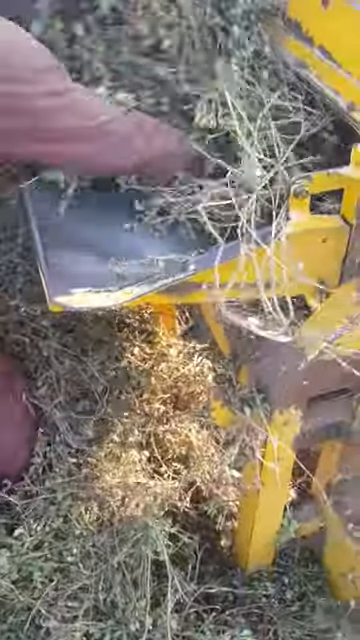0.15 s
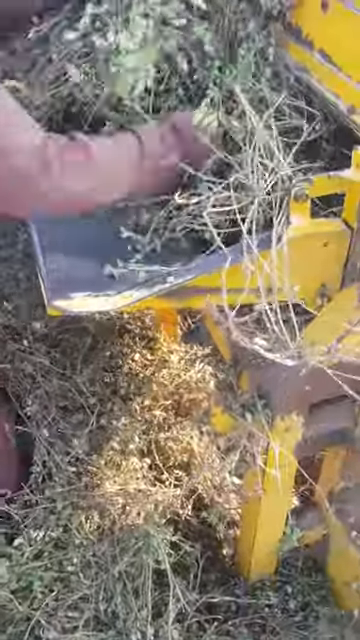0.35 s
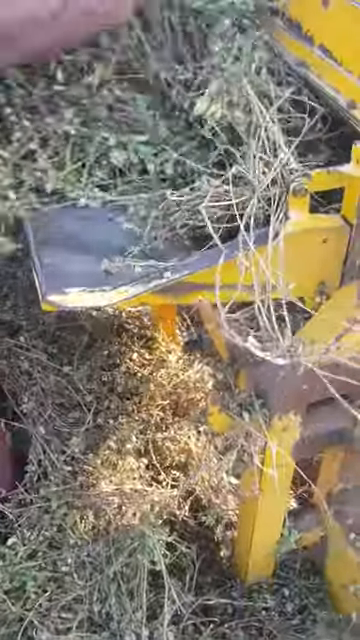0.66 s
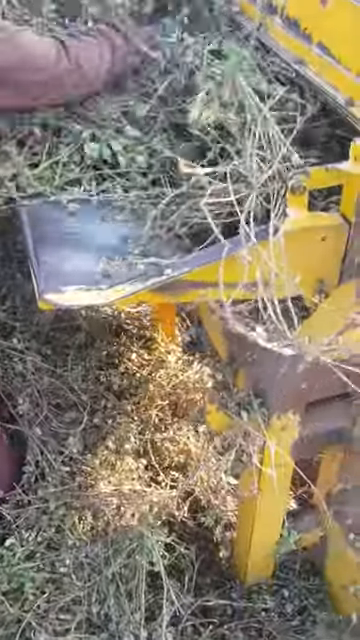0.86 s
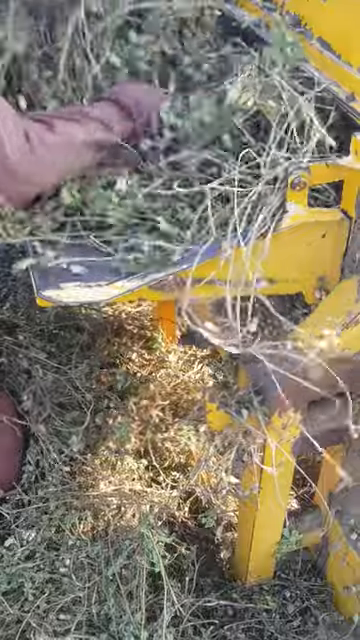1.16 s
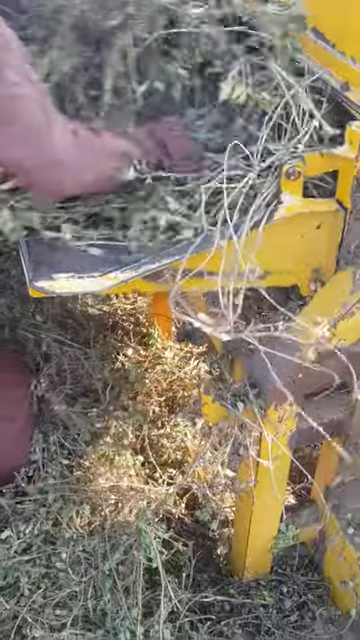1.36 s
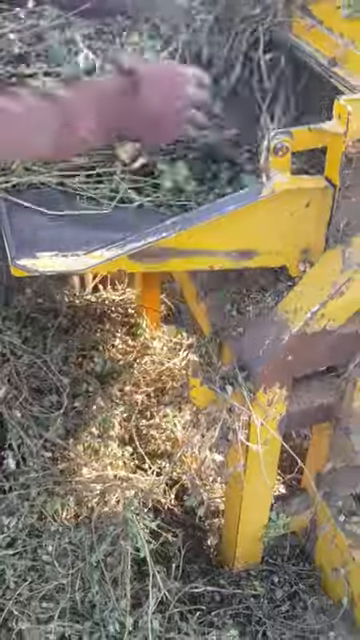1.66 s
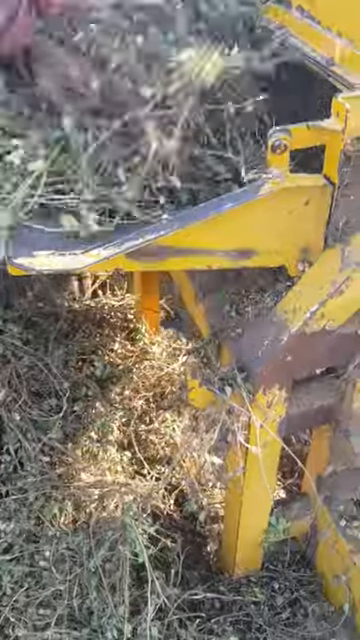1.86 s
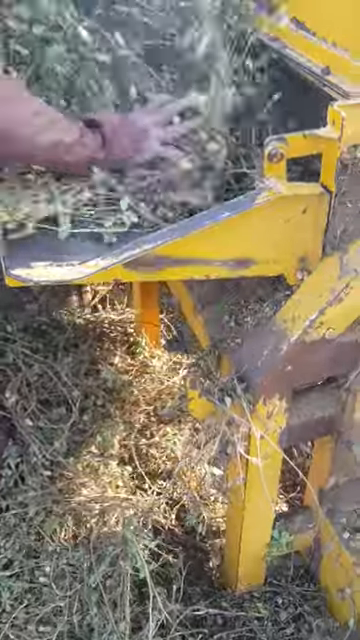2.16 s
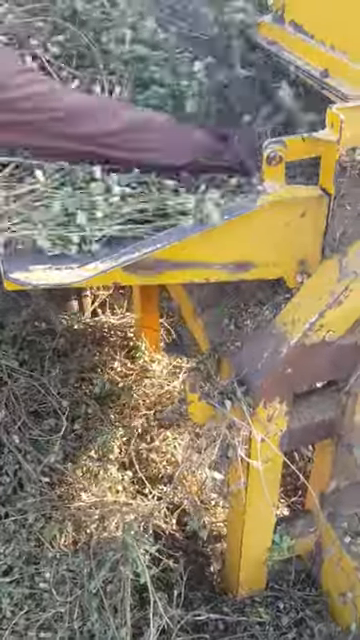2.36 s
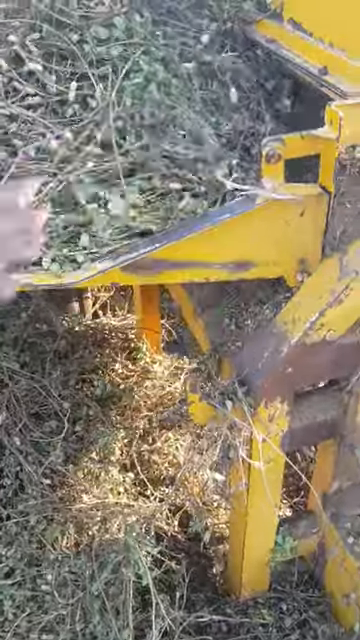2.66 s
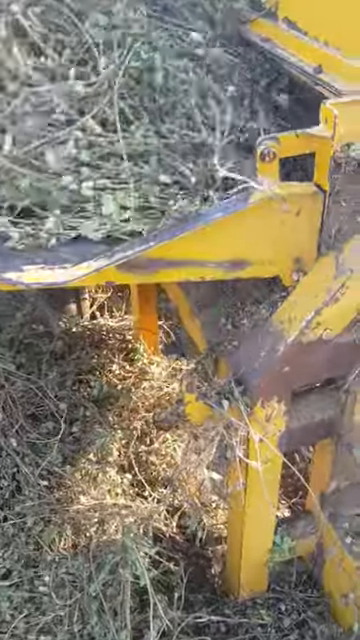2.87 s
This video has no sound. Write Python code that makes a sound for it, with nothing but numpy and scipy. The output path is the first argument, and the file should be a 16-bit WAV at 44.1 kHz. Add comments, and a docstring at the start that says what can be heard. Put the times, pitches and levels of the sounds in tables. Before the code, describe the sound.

A tractor-driven threshing machine drones loudly for all three seconds, close by in the open, over a throbbing engine roar. Dry vines crackle inside, and the sieve knocks lightly four or five times a second. At about 1.5 seconds the crackling swells as more crop goes in, with a sharp crack against metal on the right at 1.6. Smaller cracks and stem snaps follow until the end.

```python
"""A loud drone over a throbbing roar: a tractor-driven peanut thresher in an open field, heard in
stereo from beside its feed tray. The spinning drum drones, the engine fires low beneath it, and air
and crop roar in the steel housing. The shaking sieve knocks as it turns. Dry vines crackle in the
drum, more loudly once a fresh bundle goes in, and hard bits crack against the metal."""
import sys
import numpy as np
from scipy import signal
from scipy.fft import rfft, irfft
from scipy.io import wavfile

SR = 44100
rng = np.random.default_rng(int(sys.argv[2]) if len(sys.argv) > 2 else 0)


def int16_out(signal):
    """Quantize to a 16-bit WAV file."""
    q = np.round(np.clip(np.atleast_2d(signal).T, -1, 1) * 32767)
    wavfile.write(sys.argv[1], SR, q.astype(np.int16))


N = 133182
T = np.arange(N) / SR
BIN_HZ = np.arange(N // 2 + 1) * SR / N
CRANK_HZ = 29.8
FEED_LAG_S = 0.00026   # the feed opening lies to the right, so the left microphone hears it later

# spectrum of dry crop crackling: f/Hz, left level/dB, right level/dB
CRACKLE_SPECTRUM = [(800, -85, -96), (1980, -72.5, -70.5), (3680, -83, -74.5), (5300, -86, -68.5),
                    (6650, -92, -74.5), (8060, -95, -84), (9070, -83, -80.5), (11020, -84, -79.5),
                    (12370, -85.5, -72), (15500, -94, -76.5)]


def from_db(db):
    """Decibels to gain."""
    return 10 ** (np.asarray(db) / 20)


def in_time(rows):
    """A curve of (time, value) points at every sample."""
    return np.interp(T, *np.transpose(rows))


def over_hz(rows):
    """Each column of a spectrum at every frequency bin."""
    hz, *columns = np.transpose(rows)
    log_bins = np.log(np.maximum(BIN_HZ, 1))
    return np.array([np.interp(log_bins, np.log(hz), column) for column in columns])


def drift(rate_hz):
    """Slow random wander with a spread of 1."""
    step, settle = 40, 2000
    pole = np.exp(-2 * np.pi * rate_hz * step / SR)
    noise = rng.standard_normal(N // step + settle + 2)
    slow = signal.lfilter([1], [1, -2 * pole, pole * pole], noise)[settle:]
    return np.interp(np.arange(N) / step, np.arange(len(slow)), slow / slow.std())


def colour(white, spectrum):
    """Give white stereo noise a spectrum in dB per Hz."""
    return irfft(rfft(white) * from_db(over_hz(spectrum)), N) * np.sqrt(SR / 2)


def split(x, hz):
    """The parts below and above a frequency; they sum to the whole."""
    low = irfft(rfft(x) / (1 + (BIN_HZ / hz) ** 10), N)
    return low, x - low


def burst(start, attack_s, hold_s, decay_s):
    """Envelope with a linear attack, a hold and an exponential release."""
    age = T - start
    return np.clip(age / attack_s, 0, 1) * np.exp(-np.clip((age - attack_s - hold_s) / decay_s, 0, 20))


def grains(per_s=4000, spread_db=3.5, click_share=0.38, likeness=0.27):
    """Countless tiny contacts over a smooth hiss, partly shared by both microphones; white, rms 1."""
    sizes = from_db(spread_db * np.minimum(rng.exponential(1, (3, N)), 5))
    clicks = sizes * rng.choice([-1, 1], (3, N)) * (rng.random((3, N)) < per_s / SR)
    hiss = np.sqrt(1 - click_share) * rng.standard_normal((3, N))
    left, right, both = np.sqrt(click_share) * clicks / clicks.std() + hiss
    shared = np.array([np.interp(T - FEED_LAG_S, T, both), both])
    return np.sqrt(1 - likeness) * np.array([left, right]) + np.sqrt(likeness) * shared


def bright_crackle(above_hz):
    """The treble alone of dry crop crackling."""
    highpass = signal.butter(4, above_hz, "high", fs=SR, output="sos")
    return signal.sosfilt(highpass, colour(grains(), CRACKLE_SPECTRUM))


def steel(force, modes):
    """Parallel resonances of a steel part; a white force of rms 1 drives each to its level."""
    ringing = 0
    for k, (hz, width, db) in enumerate(modes):
        radius = np.exp(-np.pi * width / SR)
        forward = np.sqrt((1 - radius ** 2) / 2) * np.array([1, 0, -1])
        feedback = [1, -2 * radius * np.cos(2 * np.pi * hz / SR), radius ** 2]
        ringing += (-1) ** k * from_db(db) * signal.lfilter(forward, feedback, force)
    return ringing


def tone(turns, db):
    """One tone of a turning part, wavering in pitch and level."""
    wobble_turns = 0.035 * drift(rate_hz=9)
    amplitude = np.sqrt(2) * from_db(db + 0.73 * drift(rate_hz=11))
    return amplitude * np.sin(2 * np.pi * (turns + wobble_turns + rng.random()))


def engine():
    """Low firing tones of the tractor."""
    # engine tones: multiple of the crank rate, level/dB
    orders = [(2, -30.5), (4, -36), (5, -60), (7, -35.5)]
    return sum(tone(k * CRANK_HZ * T, db) for k, db in orders)


def housing(feed_above_hz=1100):
    """Air and tumbling crop roar in the sheet-steel body, pulsing with the crank, churning with load."""
    # spectrum of the roar: f/Hz, left level/dB, right level/dB
    roar_spectrum = [(22, -77, -77), (32, -66, -66), (49.3, -45.5, -56.5), (71, -41, -38.5),
                     (97, -46, -47.5), (127, -50, -49), (159.5, -47.5, -40), (234, -45, -41.5),
                     (299, -49.5, -47.5), (318.6, -43.5, -44.5), (416, -50, -52.5), (472, -49, -49),
                     (530, -56.5, -49.5), (646, -57, -48), (652, -59.5, -53), (800, -58.5, -60.5),
                     (897, -62.5, -54.5), (1280, -67.5, -62), (1800, -72.5, -65.5), (2110, -75, -70),
                     (2700, -95.5, -75), (5000, -84, -90), (9000, -105, -100)]
    # likeness of the roar at the two microphones: f/Hz, correlation
    likeness = [(100, 1), (210, 0.94), (300, 0.75), (450, 0.99), (690, 0.35), (850, 0.71), (1100, 0.27),
                (1400, 0.26), (3000, 0.21)]
    alike = over_hz(likeness)
    mid, side = rfft(rng.standard_normal((2, N)))
    pair = np.sqrt((1 + alike) / 2) * mid + np.sqrt((1 - alike) / 2) * side * [[1], [-1]]
    lag_s = FEED_LAG_S * (BIN_HZ > feed_above_hz) * [[1], [0]]   # the treble leaves by the feed opening
    white = irfft(pair * np.exp(-2j * np.pi * BIN_HZ * lag_s), N)
    throb = 1 + 0.077 * np.sin(2 * np.pi * CRANK_HZ * T)
    churn = from_db(0.59 * drift(rate_hz=25.2))
    return colour(white * throb * churn, roar_spectrum)


def sieve():
    """As the sieve turns, the loose frame chatters and pods land on the mesh, right of centre."""
    # sieve strokes: t/s, knock level/dB, pod level/dB (both relative)
    strokes = [(.021, -1.5, 0.5), (.235, -10, -8), (0.461, -5, -3), (.672, -17, -1), (0.891, -4.5, 1),
               (1.107, -7, -4), (1.322, -1.5, -1.5), (1.539, -3.5, -4), (1.760, -8, -12), (1.97, -7, -7),
               (2.414, -8, -5), (2.634, -12, -2), (2.856, -1, -13)]
    # resonances of the frame: f/Hz, width/Hz, level/dB
    frame_modes = [(1140, 71, -31), (1480, 180, -36.5), (1734, 40, -30), (2003, 270, -31.5),
                   (2870, 620, -38)]
    knocks = pods = 0
    for t, knock_db, pod_db in strokes:
        knocks += from_db(knock_db) * burst(t, attack_s=0.0012, hold_s=0.018, decay_s=0.017)
        pods += from_db(pod_db + 3.5) * burst(t + 0.0041, attack_s=0.0012, hold_s=0.0069, decay_s=0.013)
    chatter = steel(knocks * grains(), frame_modes) * from_db([[-4], [0]])
    return chatter + pods * bright_crackle(above_hz=5900)


def cracks():
    """Clods and thick roots are flung against the drum cover, well to the right."""
    # impacts: t/s, relative level/dB, decay/s
    hits = [(1.635, 4.5, 0.0018), (1.641, -3.5, 0.03), (1.834, -6, 0.021), (1.972, -7, 0.011),
            (2.33, -8.5, 0.015), (2.473, -9, 0.015), (2.782, -8.5, 0.011)]
    # resonances of the cover: f/Hz, width/Hz, level/dB
    cover_modes = [(2050, 270, -24.5), (2780, 960, -33), (3310, 460, -28.5), (5090, 1100, -25),
                   (6630, 930, -31)]
    force = sum(from_db(db) * burst(t, attack_s=0.00033, hold_s=0.00067, decay_s=decay)
                for t, db, decay in hits)
    return steel(force * grains(), cover_modes) * from_db([[-10.5], [0]])


def vines():
    """Stalks shred and leaves rustle in clumps; single stems snap close to the microphones."""
    # shredding stalks: t/s, relative level/dB
    stalk_level = [(0, -1), (.7, -3), (.9, -0.3), (1.25, -1.7), (1.58, 1), (1.66, 4), (1.74, 0), (2.1, 1),
                   (2.28, 0), (2.42, 0), (2.65, 0), (3.02, 1)]
    # rustling leaves, loudest as the bundle goes in: t/s, relative level/dB
    leaf_level = [(0, 0), (.6, -2.2), (.85, -0.5), (1.42, -1.5), (1.51, 4), (1.6, 2.5), (1.69, 6),
                  (1.78, 1.5), (2, 2), (2.17, 0.5), (2.32, 2), (2.6, 0), (2.85, 0.5), (3.02, 3)]
    # dry stems snapping near the tray: t/s, relative level/dB
    stem_snaps = [(.358, 1), (.466, 3), (1.178, 9.5), (1.677, 5), (1.763, 7), (2.657, 7), (2.893, 6)]
    crackle = colour(grains(), CRACKLE_SPECTRUM)
    clumps = from_db(1.15 * drift(rate_hz=30))
    coarse, leaves = split(crackle * clumps, hz=7640)
    crunch, stalks = split(coarse, hz=3840)
    stalks *= from_db(in_time(stalk_level) - 0.5)
    leaves *= from_db(in_time(leaf_level) - 0.9)
    snaps = sum(from_db(db) * burst(t, attack_s=0.001, hold_s=0.0026, decay_s=0.0037)
                for t, db in stem_snaps)
    return crunch + stalks + leaves + snaps * bright_crackle(above_hz=13000)


def drum(drone_db=-19.5):
    """The threshing drum and its fan drone near the centre, sagging slightly under load."""
    # pitch of the drone as the bundle goes in: t/s, f/Hz
    pitch = [(0, 187.9), (1.2, 187), (1.65, 186.5), (3.02, 186.4)]
    # drum tones: multiple of the drone pitch, level/dB relative to the drone
    partials = [(1/5, -24), (2/5, -15.5), (1/2, -3), (3/5, -17.5), (4/5, -18), (1, 0), (17/10, -21.5),
                (19/10, -22.5)]
    turns = np.cumsum(in_time(pitch)) / SR
    return sum(tone(k * turns, drone_db + db) for k, db in partials) * from_db([[-0.4], [0.4]])


def scene():
    """The whole machine at arm's length, in the open."""
    # swells and dips of the deep rumble: t/s, relative level/dB
    rumble_level = [(0, 2), (.16, 7), (.31, -4), (.48, 2.5), (1.1, 1.5), (1.28, -7), (1.48, 1.5),
                    (1.88, -1.5), (2.12, 1.5), (2.48, -4), (2.66, 2), (2.79, -1), (2.95, 4)]
    # smaller swings of the roar above it: t/s, relative level/dB
    roar_level = [(0, 0), (.85, -0.3), (1.12, 1), (1.25, -1.5), (1.4, -0.1), (1.95, -1), (2.48, 0.3),
                  (2.62, -.8), (3.02, 1)]
    rumble, roar = split(engine() + housing(), hz=90)
    body = rumble * from_db(in_time(rumble_level)) + roar * from_db(in_time(roar_level))
    return drum() + body + vines() + sieve() + cracks()


def record(dry, cutoff_hz=15950):
    """The top of the treble is cut steeply on both channels."""
    return signal.sosfilt(signal.ellip(14, 0.1, 90, cutoff_hz, fs=SR, output="sos"), dry)


dry = scene()
out = record(dry)
int16_out(out)
```